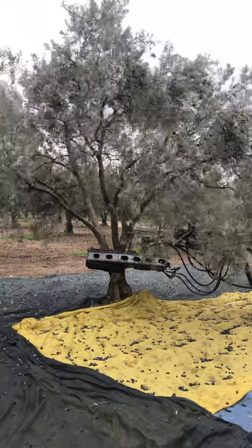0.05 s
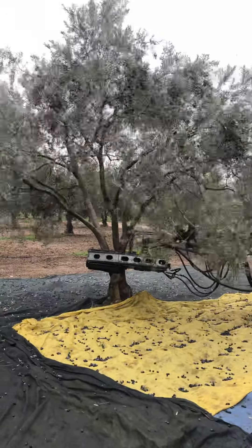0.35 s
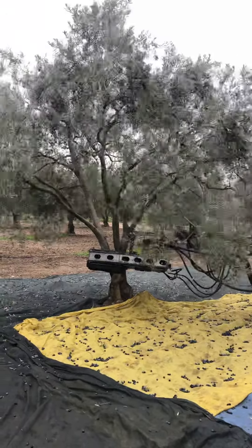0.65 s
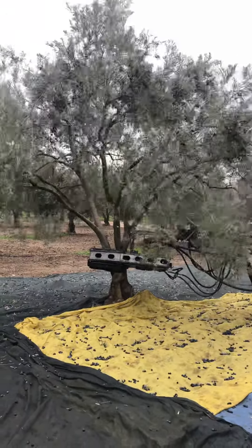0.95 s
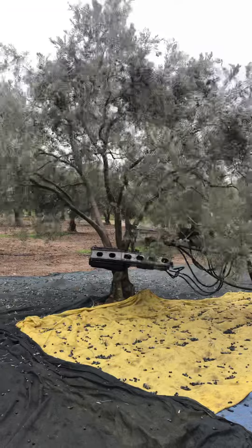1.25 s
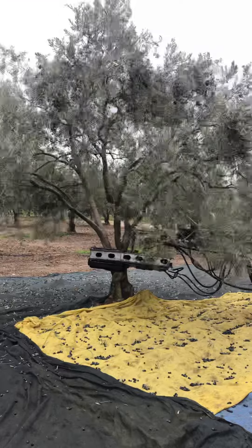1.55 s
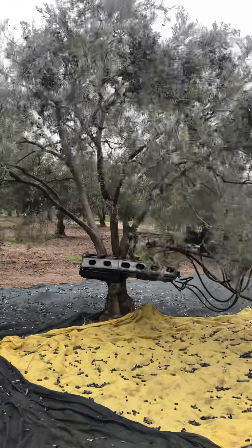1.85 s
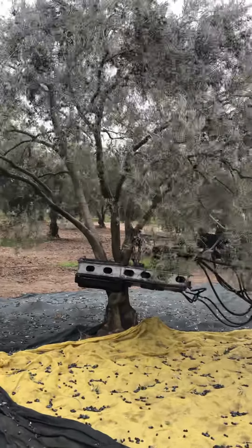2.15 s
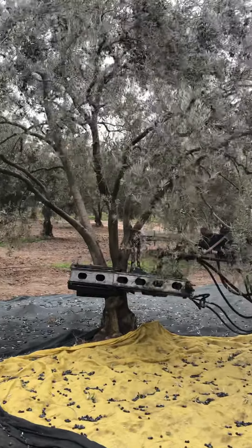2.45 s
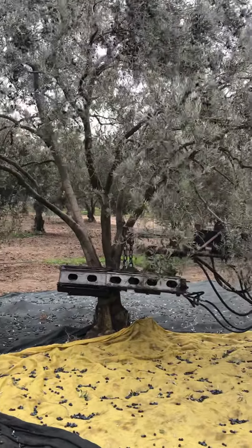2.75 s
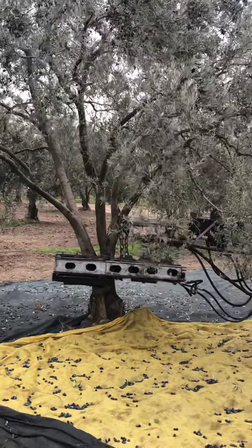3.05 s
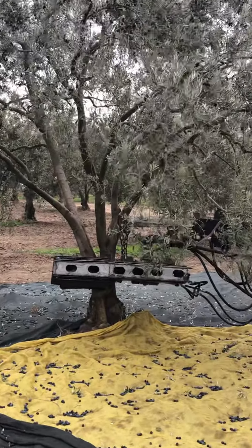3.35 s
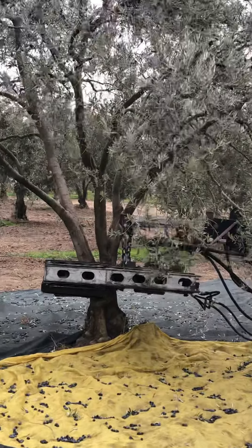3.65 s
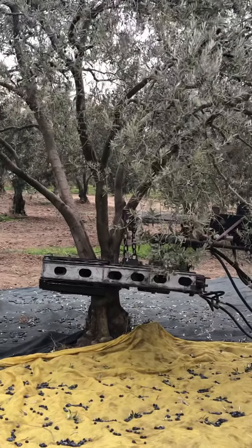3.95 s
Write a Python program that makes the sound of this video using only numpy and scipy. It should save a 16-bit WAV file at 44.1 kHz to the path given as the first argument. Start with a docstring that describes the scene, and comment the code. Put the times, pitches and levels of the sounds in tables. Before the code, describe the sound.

A tree shaker rattles loudly, winding down to a low diesel drone with metal clanks.

```python
"""A loud rattle of steel clamp and chains, with thrashing twigs: a hydraulic shaker grips an olive tree.
As it winds down, the blows that ring the steel thin to single clinks, then the slackening jaws
clank and scrape on the bark. Underneath, the diesel's firings slow to a low drone, the pump whine
sinks and a turbo whistle pulses with each firing. Near the end, oil hisses and squeals in a valve."""
import sys
import numpy as np
from scipy import signal
from scipy.fft import rfft, irfft
from scipy.io import wavfile
from scipy.ndimage import uniform_filter1d

SR = 44100
rng = np.random.default_rng(int(sys.argv[2]) if len(sys.argv) > 2 else 0)


def persist_wave(psi):
    """Save psi, clipped to +-1, as 16-bit WAV."""
    counts = np.round(np.clip(psi, -1, 1) * 32767).astype(np.int16)
    wavfile.write(sys.argv[1], SR, np.atleast_2d(counts).T)


N = 176400
T = np.arange(N) / SR


def undb(db):
    """Decibels to gain."""
    return 10 ** (np.asarray(db) / 20)


def unit(x):
    """Scale to rms 1."""
    return x / np.sqrt(np.mean(x ** 2) + 1e-18)


def curve(table, column=1):
    """One column of a table as an automation curve."""
    rows = np.array(table, float)
    return np.interp(T, rows[:, 0], rows[:, column])


def colour(x, points):
    """EQ a sound through (Hz, dB) points, at rms 1."""
    rows = np.array(points, float)
    hz = np.maximum(np.fft.rfftfreq(N, 1 / SR), 1)
    eq_db = np.interp(np.log(hz), np.log(rows[:, 0]), rows[:, 1])
    return unit(irfft(rfft(x) * undb(eq_db), N))


def band(x, low_hz, high_hz, order=2):
    """Butterworth band-pass."""
    sos = signal.butter(order, [low_hz, min(high_hz, .45 * SR)], "band", fs=SR, output="sos")
    return signal.sosfilt(sos, x)


def noise_band(samples, low_hz, high_hz, order=2):
    """Band-passed noise at rms 1."""
    return unit(band(rng.standard_normal(samples), low_hz, high_hz, order))


def wander(per_s):
    """Smooth random modulation at rms 1."""
    hold = int(SR / per_s)
    steps = np.repeat(rng.standard_normal(N)[:N // hold + 1], hold)
    return unit(uniform_filter1d(uniform_filter1d(steps, hold), hold)[:N])


def fade(t, t60):
    """Exponential decay, 60 dB down at t60."""
    return np.exp(-np.log(1000) * t / t60)


def ring(x, hz, t60):
    """Drive one decaying mode."""
    pole = np.exp((2j * np.pi * hz - np.log(1000) / t60) / SR)
    return signal.lfilter([1], [1, -pole], x + 1e-18).imag


def strike(modes, t, scatter_db=3, detune=0.0013):
    """A body struck once; each blow weights the modes anew."""
    hz, db, t60 = np.array(modes).T[:, :, None]
    weight, shift, phase = rng.standard_normal((3, len(modes), 1))
    gain = undb(db + scatter_db * weight)
    partials = gain * np.sin(2 * np.pi * (hz * (1 + detune * shift) * t + phase)) * fade(t, t60)
    return partials.sum(0) / np.sqrt(np.sum(gain ** 2) / 2)


def add(out, start, sound):
    """Mix a sound in at a start time in seconds."""
    i = int(start * SR)
    out[i:i + len(sound)] += sound[:N - i]


def impacts(start_per_s=1300, scatter_db=-1, slowing_s=0.92):
    """Uneven random blows of steady mean power, thinning for 2 s as the shaker slows."""
    chance = start_per_s * np.exp(-np.minimum(T, 2) / slowing_s) / SR
    lands = rng.random(N) < chance
    return lands * undb(scatter_db * np.clip(rng.standard_normal(N), -2, 1.5)) / np.sqrt(chance)


def rattle(blows, modes, detune, burst_db, contacts=4):
    """Blows ring a body in uneven bursts; pitch and strongest mode shift with the contact point."""
    hits, out = np.flatnonzero(blows), np.zeros(N)
    for hz, db, t60 in modes:
        contact = rng.integers(0, contacts, N)[hits]
        force = (rng.standard_normal(N) * blows * undb(burst_db * np.tanh(wander(39.94))))[hits]
        for k, shift in enumerate(np.linspace(-1, 1, contacts)):
            push = np.zeros(N)
            push[hits] = force * (contact == k)
            out += undb(db) * ring(push, hz * (1 + detune * shift), t60) / np.sqrt(t60)
    return unit(out)


# Faders of the shaking (time [s], clamp and crown level [dB], chain level [dB])
SHAKE_LEVELS = [(0, -12, -15.5), (.13, -15, -11.5), (.28, -13.5, -14.5), (.42, -18, -14), (.55, -20, -18.5),
                (.75, -23, -19.5), (.93, -25, -27.5), (1.07, -26, -25), (1.2, -25, -22), (1.35, -26, -24),
                (1.52, -32, -34), (1.7, -33.5, -39), (1.86, -35, -45), (1.95, -44, -65), (2.2, -78, -83)]
# EQ of the thrashing crown (frequency [Hz], gain [dB])
CROWN_EQ = [(100, -18), (200, -8), (300, -6.5), (430, -16), (520, -5.5), (760, -4), (1090, -6), (1500, -2),
            (1900, -5.5), (2400, -3), (3030, -5), (4200, -8.5), (5600, -11.5), (8000, -15), (10700, -11),
            (12300, -19.5), (15500, -20)]
# Clangy modes of the clamp (frequency [Hz], gain [dB], t60 [s])
CLAMP_MODES = [(745, -3, 0.23), (1328, -1.5, 0.13), (1400, 2.5, 0.034), (1553, 1.5, 0.11), (1846, -2, 0.2),
               (2002, -5, .28), (2268, 0, 0.16), (2467, 2, 0.088), (3690, -3.5, .08), (4060, -2.5, .12),
               (4370, -0.5, .05), (4850, -2.5, 0.13), (5320, -4.5, 0.2)]
# Bright modes of the chain links (frequency [Hz], gain [dB], t60 [s])
CHAIN_MODES = [(8800, -13.5, .17), (9220, -4, .2), (9360, -3.5, 0.079), (9690, -3.5, 0.04),
               (9950, -5.5, 0.32), (10140, -1, 0.12), (10070, -13.5, 0.081), (10240, -7, 0.086)]
def shaker(clamp_db=-4, crown_db=-0.67, chain_db=-1.0, flurry_db=2.76, surge_db=1.5):
    """Clamp and chains rattle; twigs and leaves thrash in flurries, each octave on its own."""
    flurries = sum(band(rng.standard_normal(N), hz, 2 * hz) * undb(flurry_db * wander(160))
                   for hz in 86 * 2 ** np.arange(8))
    crown = undb(crown_db) * colour(flurries, CROWN_EQ)
    clamp = undb(clamp_db) * rattle(impacts(), CLAMP_MODES, detune=0.0062, burst_db=3)
    links = rattle(impacts(start_per_s=700, scatter_db=1), CHAIN_MODES, detune=0.0051, burst_db=1.5)
    chain_gain = undb(curve(SHAKE_LEVELS, column=2) + chain_db + surge_db * wander(108.9))
    return (clamp + crown) * undb(curve(SHAKE_LEVELS)) + unit(band(links, 7900, 12500)) * chain_gain


def pings(per_s=130, low_hz=1910, high_hz=7220, mean_t60=0.03, trim_db=-2, rise_db_per_s=3.0):
    """Olives, twigs and fittings ping on steel for 2 s, fading more slowly than the rattle."""
    out, t = np.zeros(N), T[:SR // 10]
    for when, pitch, size, length, partner in rng.random((2 * per_s, 5)):
        start = 2 * when
        hz = low_hz * (high_hz / low_hz) ** pitch
        pair = np.sin(2 * np.pi * hz * t) + np.sin(2 * np.pi * hz * (1 + partner / 2) * t) / 2
        accent_db = 3 * (np.log(1 / (1.1 - size)) - 1)  # many soft, a few loud
        gain = undb(trim_db + accent_db + rise_db_per_s * (start - 1))
        add(out, start, gain * pair * fade(t, mean_t60 * (.5 + length)))
    return out * undb(curve(SHAKE_LEVELS))


# Engine run-down (time [s], firing rate [Hz])
FIRING_RATE = [(0, 50.5), (.15, 48.8), (.48, 51.6), (.8, 49.3), (1.5, 41.26), (2.05, 38.65), (2.35, 37.73),
               (2.9, 38.49), (3.3, 38.46), (3.52, 39.92), (3.75, 38.54), (4, 37.73)]
# Exhaust drone (time [s], firing tone level [dB], octave level [dB])
DRONE_LEVELS = [(0, -39, -39), (.15, -37, -25.5), (.35, -35, -39), (.55, -37, -42.5), (1.1, -38, -47),
                (1.5, -40, -42), (2, -45, -36), (2.55, -48, -31), (3.5, -45, -33), (4, -44, -37)]
# Weaker engine tones (multiple of the firing rate, level [dB])
ENGINE_OVERTONES = [(3, -41.5), (4, -45.5)]
# Fader of the combustion noise (time [s], level [dB])
COMBUSTION_LEVEL = [(0, -28.5), (.7, -31), (1.5, -31.5), (2.2, -31), (2.8, -31), (3.3, -32.5), (4, -32.5)]
# EQ of the combustion noise (frequency [Hz], gain [dB])
COMBUSTION_EQ = [(76, 4), (130, 0.5), (250, -6.5), (380, -11), (517, -12), (684, -6.5), (1080, -11.5),
                 (2890, -20), (5700, -30.5), (7850, -31), (9780, -29.5), (10800, -36), (15500, -41.5)]
def engine(firings, body_knock=0.09, treble_knock=0.27, flutter_db=0.5):
    """Diesel exhaust tones over combustion noise that throbs with each firing."""
    drone = sum(undb(curve(DRONE_LEVELS, column=k)) * np.sin(2 * np.pi * k * firings) for k in (1, 2))
    overtones = sum(undb(db + 0.52 * wander(3.45)) * np.sin(2 * np.pi * k * firings + 0.7 * wander(13))
                    for k, db in ENGINE_OVERTONES)
    noise = colour(rng.standard_normal(N), COMBUSTION_EQ)
    treble = signal.sosfiltfilt(signal.butter(2, 4500, "high", fs=SR, output="sos"), noise)
    throb = np.cos(2 * np.pi * (firings - 0.44))
    knocking = (noise - treble) * (1 + body_knock * throb) + treble * (1 + treble_knock * throb)
    combustion = unit(band(knocking, 105, 16000, order=3) * undb(flutter_db * wander(100)))
    return np.sqrt(2) * (drone + overtones) + combustion * undb(curve(COMBUSTION_LEVEL))


# Fader of the exhaust boom (time [s], level [dB])
BOOM_LEVEL = [(0, -38), (.7, -50), (1.05, -38.5), (1.5, -39), (1.95, -37), (2.3, -43), (3, -41.5),
              (3.5, -37), (4, -43.5)]
def exhaust_boom():
    """Turbulent gas sounds a low resonance of the exhaust."""
    return noise_band(N, low_hz=146.5, high_hz=188.6) * undb(curve(BOOM_LEVEL))


# Chain-on-clamp cues (time [s], links [dB], ring [dB], ring pitch [Hz], ring t60 [s], crack [dB])
CLINK_CUES = [(.18, -22, -26, 1400, .04, -26), (.213, -20, -15, 2250, 0.065, -17),
              (0.349, -11, -15.5, 4130, 0.058, -20), (.395, -26, -17.5, 4080, 0.085, -18),
              (.416, -23, -20, 6080, .06, -25), (0.479, -28, -15, 4090, 0.037, -18),
              (.564, -13, -22, 4050, .14, -18.5), (.606, -15.5, -20, 2490, 0.074, -23.5),
              (.719, -14, -18, 2290, 0.084, -25), (.778, -37, -21.5, 2440, 0.13, -23),
              (0.841, -21, -24, 3900, .07, -25), (.987, -20, -19.5, 5320, 0.047, -25),
              (1.088, -34, -19, 3880, 0.054, -21.5), (1.127, -15.5, -30, 2440, 0.091, -25),
              (1.157, -20, -20, 4850, 0.071, -18.5), (1.216, -31, -30, 4100, 0.092, -31),
              (1.234, -17.5, -37, 4150, 0.11, -21.5), (1.273, -24, -17, 4080, 0.056, -22),
              (1.28, -30, -31, 9300, 0.37, -35), (1.322, -32, -22.5, 2430, 0.064, -43),
              (1.361, -14.5, -31, 4130, .12, -21), (1.46, -25, -20, 4160, 0.075, -24.5),
              (1.561, -39, -29, 9530, 0.55, -32), (1.749, -21, -26, 2670, 0.3, -22.5),
              (1.76, -27, -22, 4100, 0.11, -30.5), (1.798, -31, -33, 9480, .3, -29)]
def clinks(crack_t60=0.11, attack_s=0.00089, body_db=-3):
    """Separate blows of the swinging chains; each rings the steel where it lands."""
    out, t = np.zeros(N), T[:SR // 3]
    for start, links_db, ring_db, hz, t60, crack_db in CLINK_CUES:
        crack = noise_band(len(t), 2300, 6800) * fade(t, crack_t60)
        body = undb(body_db) * band(strike(CLAMP_MODES, t, scatter_db=-1.0, detune=0.0217), 2300, 13000)
        steel = np.sqrt(2) * np.sin(2 * np.pi * hz * t) * fade(t, t60)
        links = strike(CHAIN_MODES, t, scatter_db=-0.5, detune=0.00634)
        clink = undb(links_db) * links + undb(ring_db) * steel + undb(crack_db) * (crack + body)
        add(out, start, np.minimum(t / attack_s, 1) * clink)
    return out


def orchard(x, echo_db=-19, t60=0.53, predelay_s=0.012):
    """Add a faint tail scattered back from the trees around."""
    t = T[:SR // 2]
    tail = rng.standard_normal(len(t)) * fade(t, t60) * (t > predelay_s)
    return x + undb(echo_db) * signal.fftconvolve(x, tail / np.linalg.norm(tail))[:N]


# Glide of the pump whine (time [s], pitch [Hz], level [dB])
PUMP_GLIDE = [(.4, 391.3, -72), (.75, 367, -42.5), (1, 339.5, -43), (1.5, 278.5, -45), (2.1, 260.3, -50),
              (3.15, 259.4, -49), (3.5, 269.3, -43.5), (4, 256.7, -51.5)]
def pump(flutter_db=2, wobble_hz=2):
    """The hydraulic pump's whine sinks as the shaker winds down."""
    hz = curve(PUMP_GLIDE) + wobble_hz * wander(15)
    gain = undb(curve(PUMP_GLIDE, column=2) + flutter_db * wander(10))
    return np.sqrt(2) * np.sin(2 * np.pi * np.cumsum(hz) / SR) * gain


# Modes of the loose plate (frequency [Hz], gain [dB], t60 [s])
PLATE_MODES = [(2260, 0, 0.092), (2443, 1, 0.11)]
# Fader of its jangle (time [s], level [dB])
JANGLE_LEVEL = [(.5, -56), (.76, -32), (1.35, -38), (1.9, -94)]
def plate():
    """A loose steel plate is struck so often that its two tones run together."""
    return rattle(impacts(), PLATE_MODES, detune=0.0083, burst_db=1) * undb(curve(JANGLE_LEVEL))


# Shackle cues (time [s], level [dB])
SHACKLE_CUES = [(.93, -29), (1.015, -28), (1.1, -24), (1.2, -24.5), (1.305, -28), (1.414, -33), (1.52, -37),
                (1.572, -35), (1.631, -34), (1.76, -40), (1.866, -39), (2.71, -30)]
# Tinkling modes of the shackle (frequency [Hz], gain [dB], t60 [s])
SHACKLE_MODES = [(5350, -10, .1), (7570, 1, 0.091), (8100, 0, 0.073), (11200, 1, 0.097), (11210, 5, 0.087)]
def shackle(attack_s=0.0018, bounce_s=0.0038, bounce_db=-1):
    """A loose steel shackle swings, lands and bounces once."""
    out, t = np.zeros(N), T[:SR // 4]
    attack = np.minimum(t / attack_s, 1)
    for start, db in SHACKLE_CUES:
        for bounce in range(2):
            tinkle = strike(SHACKLE_MODES, t, scatter_db=8.5, detune=0.009)
            add(out, start + bounce * bounce_s, undb(db + bounce * bounce_db) * attack * tinkle)
    return out


# Glide of the turbo whistle (time [s], pitch [Hz], level [dB])
TURBO_GLIDE = [(1.8, 10400, -56), (2, 10200, -52), (2.3, 9820, -49), (2.7, 9720, -49), (3.1, 9600, -48),
               (3.4, 9570, -51.5), (3.75, 9050, -58), (4, 8820, -57)]
def turbo(firings, pulse_db=7, swing_hz=179, jitter_hz=50):
    """The turbo's whistle swells and dips in pitch once per firing."""
    angle = 2 * np.pi * (firings - 0.34)  # peaks a tenth of a cycle ahead of the engine's throb
    dip = np.sin(angle) + 0.15 * np.sin(angle / 2) ** 2
    hz = curve(TURBO_GLIDE) - swing_hz * dip + jitter_hz * wander(810)
    swell = unit(undb(pulse_db * np.cos(angle) + 1.5 * wander(39.7)))
    whistle = np.sqrt(2) * np.sin(2 * np.pi * np.cumsum(hz) / SR)
    return whistle * swell * undb(curve(TURBO_GLIDE, column=2))


# Slack clamp cues (time [s], level [dB], t60 [s], crack top [Hz], ring pitch [Hz], ring gain [dB])
CLANK_CUES = [(2.045, -34.5, 0.061, 4400, 2170, -2), (2.086, -32.5, 0.031, 890, 790, -2),
              (2.176, -24, 0.045, 4300, 1770, 1.5), (2.228, -38, .1, 6000, 4280, -3),
              (2.488, -26.5, 0.091, 2080, 1183, -4), (2.56, -29.5, .05, 9200, 4050, -9),
              (2.693, -21.5, .05, 3800, 2340, -4), (2.709, -18.5, 0.069, 4900, 1506, -9),
              (2.813, -34.5, 0.043, 5470, 4200, -6), (3.22, -37.5, .09, 3200, 3400, 0.5)]
# Modes of the jaws (frequency [Hz], gain [dB], t60 [s])
JAW_MODES = [(1245, 3.5, 0.089), (1830, 2, 0.088), (2114, 3, 0.1), (2340, 0, 0.057), (2730, 8, 0.094),
             (3700, -3, .06), (4900, -5, .1)]
def clanks(snap_db=-14, body_db=-2, attack_s=0.0012, hold_s=0.0071, ring_t60=0.1):
    """Steel jaws knock together: a short crack, a bright snap above it and a damped ring."""
    out, t = np.zeros(N), T[:SR // 3]
    for start, db, t60, top_hz, ring_hz, ring_db in CLANK_CUES:
        low_hz = min(1400, top_hz * min(top_hz / 9000, .4))
        crack = noise_band(len(t), low_hz, top_hz, order=3) * fade(np.maximum(t - hold_s, 0), t60)
        snap = noise_band(len(t), top_hz, top_hz * (1 + top_hz / 3500)) * fade(t, t60)
        body = band(strike(JAW_MODES, t), 200, 2 * top_hz, order=1)
        tone = np.sqrt(2) * np.sin(2 * np.pi * ring_hz * t) * fade(t, ring_t60)
        clank = crack + undb(snap_db) * snap + undb(body_db) * body + undb(ring_db) * tone
        add(out, start, undb(db) * np.minimum(t / attack_s, 1) * clank)
    return out


# Fader of the scrape (time [s], level [dB])
SCRAPE_LEVEL = [(2.5, -54), (2.57, -39), (2.61, -35), (2.66, -38), (2.7, -48), (2.74, -70)]
# EQ of the scrape (frequency [Hz], gain [dB])
SCRAPE_EQ = [(500, -22), (2400, 6), (4100, 3.5), (5300, -4), (6800, 1), (9000, -13), (15000, -35)]
def scrape(grain_db=-4.0):
    """A jaw slides on the bark with a brief gritty rasp."""
    grit = rng.standard_normal(N) * undb(grain_db * wander(250))
    return colour(grit, SCRAPE_EQ) * undb(curve(SCRAPE_LEVEL))


# Fader of the valve hiss (time [s], level [dB])
HISS_LEVEL = [(2.7, -62), (3, -59), (3.25, -53), (3.55, -45.5), (3.8, -51), (4, -54)]
def valve_hiss():
    """Turbulent oil sounds a broad resonance in a valve."""
    return noise_band(N, low_hz=2750, high_hz=3450) * undb(curve(HISS_LEVEL))


# Tones of the squeal (frequency [Hz], gain [dB])
SQUEAL_TONES = [(8420, 5), (9900, 5), (13060, 0), (14100, 0)]
# Fader of the squeal (time [s], level [dB])
SQUEAL_FADER = [(3.36, -90), (3.45, -56), (3.6, -62), (3.8, -90)]
def valve_squeal(flicker_db=4):
    """At full flow the oil valve squeals in thin, flickering tones."""
    out = np.zeros(N)
    for hz, db in SQUEAL_TONES:
        gain = undb(db + flicker_db * np.tanh(2 * wander(60)))
        out += gain * np.sin(2 * np.pi * hz * T + 2 * wander(200))
    return out * undb(curve(SQUEAL_FADER))


def scene():
    """Mono mix of engine, hydraulics and shaker; only clinks and clanks echo off the trees."""
    firings = np.cumsum(curve(FIRING_RATE)) / SR  # running count, locks the turbo's pulse to the engine
    machine = engine(firings) + exhaust_boom() + turbo(firings) + pump() + valve_squeal() + valve_hiss()
    clatter = shaker() + pings() + plate() + scrape() + shackle()
    return (machine + clatter + orchard(clinks() + clanks()))[None]


def record(dry):
    """Clip peaks at full scale, then cut the top steeply at 15.7 kHz."""
    high_cut = signal.ellip(10, .2, 80, 15700, fs=SR, output="sos")
    return signal.sosfilt(high_cut, np.clip(dry, -1, 1))


dry = scene()
out = record(dry)
persist_wave(out)
```